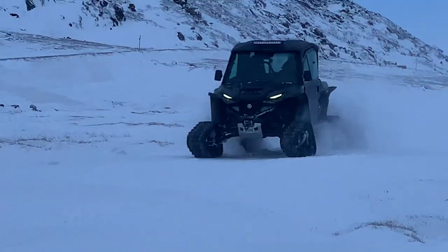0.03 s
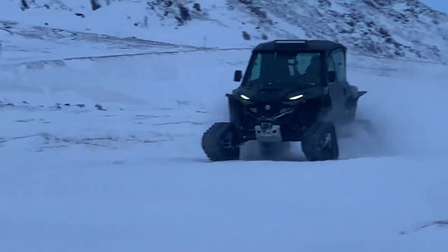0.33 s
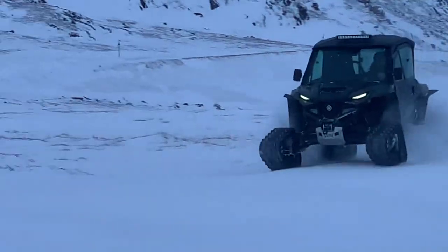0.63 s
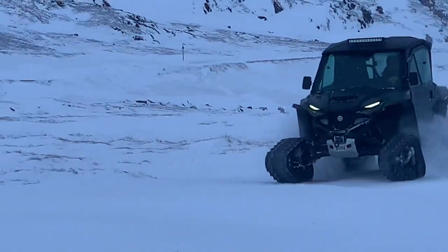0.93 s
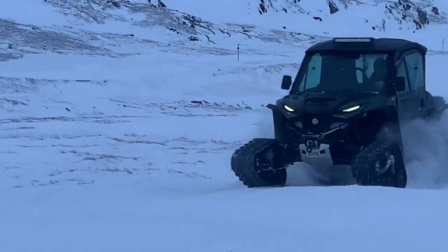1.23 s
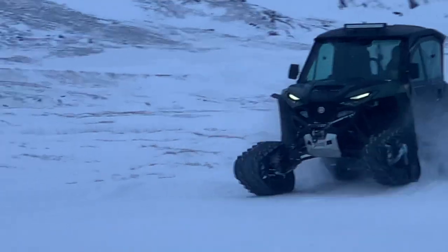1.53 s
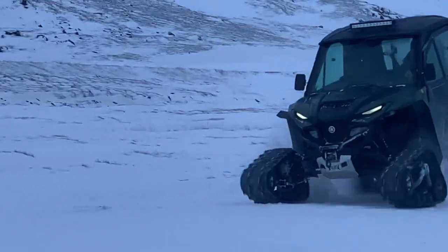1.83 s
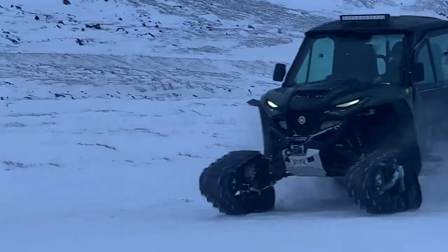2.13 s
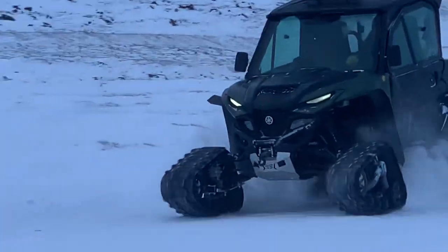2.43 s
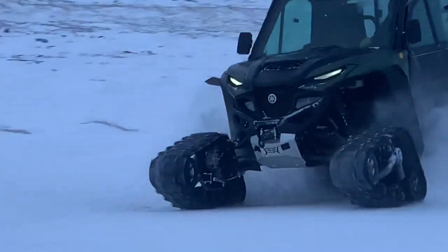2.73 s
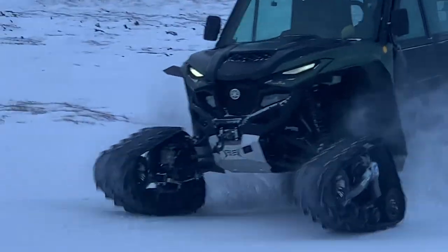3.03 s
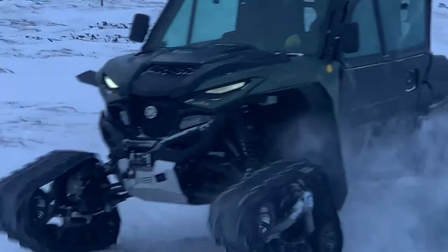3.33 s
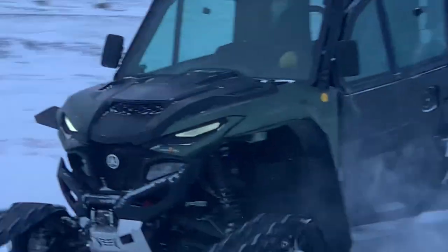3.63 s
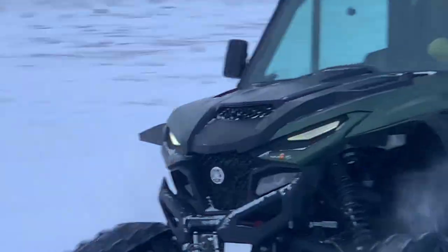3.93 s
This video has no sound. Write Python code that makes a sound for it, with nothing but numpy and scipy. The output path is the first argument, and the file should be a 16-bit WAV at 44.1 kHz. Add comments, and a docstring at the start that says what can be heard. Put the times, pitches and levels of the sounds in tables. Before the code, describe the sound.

A tracked off-road vehicle approaches across open snow, its engine droning and buzzing at nearly steady revs. The tracks patter, snow crunches and the suspension thumps lightly as it grows louder, ending close to the microphone.

```python
"""An exhaust drone is heard first, with engine buzz, clatter and the patter of track lugs: a twin-cylinder
utility vehicle on rubber tracks approaches over open snow at nearly steady revs, growing louder.
Periodic firing gives harmonics (orders) of the engine cycle rate; the lugs drum at a rate of their own.
Snow crunches and sprays in many tiny impacts, the suspension thumps over bumps, single orders whine,
and ice fizzes and ticks. Near the end the engine bay roars and the near track churns."""
import sys
import numpy as np
from scipy.fft import rfft, irfft, next_fast_len
from scipy.io import wavfile
from scipy.ndimage import map_coordinates

SR = 44100
rng = np.random.default_rng(int(sys.argv[2]) if len(sys.argv) > 2 else 0)


def bounce(signal):
    """Save signal as a 16-bit WAV file at the path given by the first command-line argument."""
    frames = np.transpose(np.atleast_2d(signal))
    limited = np.clip(frames, -1, 1)
    pcm = np.round(limited * 32767).astype(np.int16)
    wavfile.write(sys.argv[1], SR, pcm)


N = 176400

CYCLE_RATE = [(0, 58.0), (0.18, 58.2), (0.45, 56.6), (0.65, 56.2), (1, 56.8), (1.3, 57.5), (1.58, 57.9),
              (1.7, 57.1), (1.84, 55.5), (2.06, 57.5), (2.2, 56.8), (2.36, 54.7), (2.6, 57.5), (2.85, 58.0),
              (3.35, 58.1), (3.7, 57.0), (3.92, 58.0), (4, 57.9)]  # engine cycle rate: t/s, f/Hz
ODD_ORDER_LEVELS = [(0,-5.5,-9),(1.5,-2.5,-8),(2.2,-8.5,-12.5),(2.85,-6,-5.5),(3.35,-7.5,-5),(3.7,-5.5,-10.5),(4,-5.5,-7)]  # exhaust orders 1 and 3: t/s, first level/dB, third level/dB
LOW_ORDERS = [(2,-0.5),(4,-21.5),(5,-24),(6,-26.5),(7,-27.5)]  # other exhaust orders: order, level/dB
LUG_PARTIALS = [(1,-7),(1.5,-15),(2,-19.5),(3,-27)]  # track tones: multiple of the lug rate, level/dB
BUMPS = [(0.2792,-10.5,142,2.15,-23),(0.292,-19,89,5,-16),(.425,-20,130,7.3,-7.5),(0.454,-22,72,12,-35),(0.634,-15,69,12,-46),(.883,-18.5,66,15,-35),(1.7471,-8,220,1.9,-38),(1.7515,-6,112,4.5,-27),(3.435,-15.5,390,1.9,0.5),(3.4558,-5,140,2.8,-9),(3.456,-13.5,56,12,-35),(3.4565,-11.5,600,1.85,-10),(3.569,-9,280,1.9,-15),(3.594,-8.5,112,4.9,-24),(3.751,-12,245,2.4,-17)]  # suspension pulses: t/s, envelope level/dB, f/Hz, width/ms, relative rattle/dB
WHINE_SWELLS = [(5,3.9,0.19,-29),(6,3.78,.12,-31),(8,1.47,0.16,-40),(8,2.05,0.28,-39),(8,2.68,0.47,-40.5),(8,3.93,0.089,-27.5),(13,3.82,0.25,-34.5),(16,3.4,0.11,-38),(18,3.1,0.76,-42.5),(18,3.93,0.15,-37),(19,3.05,0.74,-42.5),(20,3.1,0.57,-39.5),(20,3.95,.15,-35),(21,3.32,0.25,-42.5),(22,1.75,.14,-44),(24,2.03,0.093,-39.5),(24,3.91,0.14,-30.5),(26,2.82,.55,-41.5),(26,3.95,0.074,-33),(31,3.95,0.14,-40),(32,1.27,0.33,-46.5),(32,3.58,0.1,-40.5),(41,2.03,0.11,-38),(41,2.8,0.41,-41),(42,3,0.38,-51),(43,2.68,0.37,-38),(43,3.34,0.33,-40),(44,2.75,0.16,-48),(44,3.6,0.14,-37.5),(49,3.88,0.11,-39),(58,3.7,.14,-43)]  # prominent engine orders: order, peak t/s, half-length/s, level/dB
DUST_PUFFS = [(1.64,-53),(2.21,-47)]  # puffs of ice dust: t/s, level/dB
ICE_TICKS = [(1.764,-37),(3.666,-25.5)]  # ice chip impacts: t/s, level/dB

# Envelopes: t/s, relative level/dB
EXHAUST_LEVEL = [(0,-30.5),(.22,-28),(.38,-30),(1,-27.5),(2.3,-22),(2.9,-17),(3.35,-16.5),(3.5,-16),(3.7,-14),(4,-11.5)]
CASE_LEVEL = [(0,-41.5),(.5,-40.5),(1.1,-38.5),(1.5,-35.5),(2.05,-34.5),(2.3,-35),(3.3,-30),(3.7,-30),(3.88,-26),(4,-27)]  # engine buzz and clatter
PATTER_LEVEL = [(0,-27.5),(1,-21.5),(2.2,-19),(2.45,-19.5),(2.7,-14.5),(3.3,-12.5),(4,-18)]
RUMBLE_LEVEL = [(0,-59),(.4,-38.5),(.7,-40),(1.2,-30.5),(2.3,-33),(2.8,-44),(3.3,-39),(3.5,-32),(4,-21.5)]
CRUNCH_LEVEL = [(0,-53.5),(.5,-49.5),(.68,-45.5),(.74,-44.5),(.775,-38.5),(.85,-43),(1.12,-55.5),(1.25,-49),(1.35,-40),(1.44,-42),(1.58,-48.5),(1.74,-48),(1.79,-37),(1.86,-52),(2.02,-39),(2.2,-40.5),(2.4,-42.5),(3.28,-43.5),(3.35,-36),(3.42,-39.5),(4,-42)]
SPRAY_LEVEL = [(0,-59.5),(.45,-57),(.62,-53),(1.05,-51.5),(1.2,-56.5),(1.45,-53.5),(1.75,-49.5),(2.1,-48.5),(2.55,-47),(3.45,-46.5),(3.65,-41.5),(3.85,-41.5),(4,-34.5)]

# Spectral shapes: f/Hz, relative level/dB
BUZZ_SPECTRUM = [(480,-10),(700,-3),(900,-5.5),(1150,0.5),(1280,0.5),(1400,-6),(1800,2),(2100,-12),(2420,3),(2800,-8.5),(3300,-14.5),(4500,-9)]
CLATTER_SPECTRUM = [(200,-5),(450,3.5),(900,-1),(1250,1.5),(1800,1),(2080,-4.5),(2430,2),(2800,-8),(3200,-3.5),(4500,-25.5),(7000,-28),(15000,-53)]
RUMBLE_SPECTRUM = [(20,-24),(35,-6),(50,7.5),(80,8),(130,-6.5),(190,0),(260,2.5),(350,-8),(550,-13),(900,-18),(2000,-51)]
CRUNCH_SPECTRUM = [(800,-32),(2500,1),(3700,2.5),(5000,-5),(6500,-3.5),(9000,-28.5),(15000,-33)]
SPRAY_SPECTRUM = [(2500,-18),(5000,-0.5),(6500,-9),(8000,-0.5),(9500,1),(10700,-1),(11800,-22),(13000,-10.5),(14500,-14),(15700,-24)]
RATTLE_SPECTRUM = [(100,-40),(280,8.5),(700,-3.5),(1100,-24),(3000,-62)]
DUST_SPECTRUM = [(4000,-20),(9000,-3),(12000,-8),(14000,0),(15700,-6)]
CHIP_SPECTRUM = [(3000,-23),(6500,-17),(8500,11),(11000,3),(15000,-21)]
BAY_SPECTRUM = [(200,0),(500,6),(750,12),(1400,-18),(1900,0),(2300,-2),(3200,-1),(5000,-25),(10000,-33)]
CHURN_SPECTRUM = [(60,1),(150,3.5),(240,4),(370,1.5),(480,-1.5),(720,-7.5),(1000,-10),(2500,-49)]

COHERENCE = [(45,1),(100,.997),(150,.93),(260,.8),(400,.74),(700,.6),(1300,.86),(2500,.82),(4000,.72),(5500,.8),(6800,.98),(8000,.9),(10000,.88),(11500,.99),(14000,.9)]  # likeness of left and right: f/Hz, correlation
PORT_PHASE = [(500,0),(4800,0),(5800,-1.4),(6400,-2.9),(7500,-3.4),(8500,-5.7),(9700,-6.4),(11200,-9),(12300,-9.6),(13200,-12.3),(15000,-12.8)]  # phase lead of the left microphone port: f/Hz, phase/rad
PORT_BALANCE = [(150,0),(400,1),(1300,1),(2400,2.5),(4400,-1),(8000,0)]  # left port relative to right: f/Hz, level/dB


def amp(db):
    """Amplitude ratio of a level in decibels."""
    return 10 ** (np.asarray(db) / 20)


def unit(x):
    """Normalisation to rms 1."""
    return x / np.sqrt(np.mean(x ** 2) + 1e-20)


def along(points, hz):
    """Interpolation of (f/Hz, value) points on a logarithmic frequency axis."""
    f, v = np.transpose(points)
    return np.interp(np.log(hz + 1), np.log(f + 1), v)


def curve(rows):
    """Linear interpolation of (t/s, value) points at every sample."""
    return np.interp(np.arange(N) / SR, *np.transpose(rows))


def wobble(rate):
    """Smooth random modulation: a spline through `rate` Gaussian knots a second."""
    return map_coordinates(rng.standard_normal(4096), [np.arange(N) * rate / SR], mode="mirror")


def filtered(x, response):
    """Linear filtering: the spectrum is multiplied by a complex frequency response."""
    m = next_fast_len(N + SR // 4)
    return irfft(rfft(x, m) * response(np.fft.rfftfreq(m, 1 / SR)), m)[..., :N]


def spread(pair, spectrum):
    """Partial coherence: two independent signals mix into a coloured stereo pair of rms 1."""
    def response(hz):
        angle = np.arccos(np.clip(along(COHERENCE, hz), -1, 1)) / 2
        return amp(along(spectrum, hz)) * [np.cos(angle), np.sin(angle)]
    mid, side = filtered(pair, response)
    return unit(np.array([mid + side, mid - side]))


def noise(spectrum, gate=1):
    """Source and filter: amplitude-modulated stereo noise is shaped by a spectrum."""
    return spread(gate * rng.standard_normal((2, N)), spectrum)


def grains(rate, scatter_db):
    """Shot noise: on average `rate` tiny impacts a second, rms 1."""
    hits = rng.random(N) < rate / SR
    return unit(hits * amp(scatter_db * np.minimum(rng.exponential(size=N), 4)))


def exhaust(cycle, far_waver_db, near_waver_db, rough_db, smear_rad):
    """Harmonic series of the firing pulses, dispersed by the pipe; it wavers most when far off."""
    waver_db = np.linspace(far_waver_db, near_waver_db, N)
    first_db = curve([(s, db) for s, db, _ in ODD_ORDER_LEVELS])
    third_db = curve([(s, db) for s, _, db in ODD_ORDER_LEVELS])
    drone = np.zeros(N)
    for k, db in LOW_ORDERS + [(1, first_db), (3, third_db)]:
        harmonic = np.sqrt(2) * np.cos(2 * np.pi * k * cycle - smear_rad * k * k)
        drone += amp(db + waver_db * wobble(14)) * harmonic
    return drone * amp(curve(EXHAUST_LEVEL) + rough_db * wobble(50))


def case_buzz(cycle, drift_hz, jitter_cycles):
    """Forced vibration of the case: orders 9 to 72 drift in level and phase as the vehicle moves."""
    pair, t = np.zeros((2, N)), np.arange(N) / SR
    fundamental = np.exp(2j * np.pi * (cycle + jitter_cycles * wobble(40)))
    harmonic = fundamental ** 8
    for knots in rng.standard_normal((64, 2, 2, 24)):  # order, channel, real or imaginary, knot
        harmonic = harmonic * fundamental
        for channel, (re, im) in zip(pair, knots):
            fading = np.interp(t * drift_hz, np.arange(len(re)), re + 1j * im)
            channel += (fading * harmonic).real
    return spread(pair, BUZZ_SPECTRUM)


def engine(cycle, buzz_db, near_boost_db, clatter_db, bay_db, cycle_depth_db, firing_depth_db):
    """Amplitude modulation: over the buzz, firing pulses the valve clatter and the open bay's roar."""
    pulsing = amp(cycle_depth_db * np.cos(2 * np.pi * cycle) + firing_depth_db * np.cos(4 * np.pi * cycle))
    clatter = amp(clatter_db) * noise(CLATTER_SPECTRUM, pulsing * amp(0.88 * wobble(25.3)))
    exposure = curve([(3, 0), (3.87, 1)])  # the engine bay draws level with the listener
    buzz = amp(buzz_db + near_boost_db * exposure) * case_buzz(cycle, drift_hz=3.2, jitter_cycles=0.0017)
    roar = amp(bay_db) * exposure * noise(BAY_SPECTRUM, pulsing * grains(2500, scatter_db=2.5))
    return amp(curve(CASE_LEVEL)) * (buzz + clatter) + roar


def tracks(lug_cycle, tone_db, waver_db, lumpy_db, churn_db):
    """Periodic impacts of lugs on wheels give tones over a rumble; close by, the belt slaps and churns."""
    tones = np.zeros(N)
    for k, db in LUG_PARTIALS:
        gain = amp(db + waver_db * wobble(7.6))
        tones += gain * np.cos(2 * np.pi * (k * lug_cycle + 0.08 * wobble(10)))
    lumps = amp(lumpy_db * np.tanh(wobble(45)))
    rumble = amp(curve(RUMBLE_LEVEL)) * noise(RUMBLE_SPECTRUM, lumps)
    nearness = curve([(3.32, 0), (3.58, 1)])
    churn = amp(churn_db) * nearness * noise(CHURN_SPECTRUM, grains(900, scatter_db=3))
    return amp(curve(PATTER_LEVEL) + tone_db) * tones + rumble + churn


def snow(lug_cycle, crunch_db, spray_db, lug_depth_db, clump_db):
    """Granular noise: each lug crushes a clump of crust, and powder hisses off the tracks."""
    bite = amp(lug_depth_db * np.cos(2 * np.pi * lug_cycle) + clump_db * wobble(70))
    crunch = noise(CRUNCH_SPECTRUM, bite * grains(7000, scatter_db=0))
    spray = noise(SPRAY_SPECTRUM, grains(16000, scatter_db=0.5))
    return amp(curve(CRUNCH_LEVEL) + crunch_db) * crunch + amp(curve(SPRAY_LEVEL) + spray_db) * spray


def suspension(rise_s, t60_s):
    """Impulsive excitation: a bump gives one push and rebound, and a damped rattle of the chassis."""
    push, shake = np.zeros(N), np.zeros(N)
    for s, db, hz, width_ms, rattle_db in BUMPS:
        t = np.arange(N) / SR - s
        window = np.exp(-.5 * (t * 1000 / width_ms) ** 2)
        push -= amp(db) * window * np.sin(2 * np.pi * hz * t)
        shake += amp(db + rattle_db) * np.exp(np.minimum(t / rise_s, -np.log(1000) * t / t60_s))
    return push + shake * noise(RATTLE_SPECTRUM)


def whines(cycle, whine_db, flutter_db, jitter_cycles, sway_cycles):
    """Directional radiation: single orders swell and fade as the case turns toward the listener."""
    t, pair = np.arange(N) / SR, np.zeros((2, N))
    for k, s, half_s, db in WHINE_SWELLS:
        swell = amp(db + flutter_db * wobble(21.985)) * np.exp(-((t - s) / half_s) ** 2)
        phase = k * (cycle + jitter_cycles * wobble(40)) + rng.random()  # higher orders rasp more
        sway = np.array([[1], [-1]]) * sway_cycles * wobble(3.83)  # opposite at the two ears
        pair += swell * np.cos(2 * np.pi * (phase + sway))
    return amp(whine_db) * pair


def ice(tick_s, puff_s):
    """Noise transients: fine dust fizzes in short puffs, and chips of ice tick against the bodywork."""
    t = np.arange(N) / SR
    ticks = sum(amp(db) * np.exp(-abs(t - s) / tick_s) for s, db in ICE_TICKS)
    puffs = sum(amp(db) * np.exp(-((t - s) / puff_s) ** 2) for s, db in DUST_PUFFS)
    return ticks * noise(CHIP_SPECTRUM) + puffs * noise(DUST_SPECTRUM)


def scene():
    """Superposition of the sources; engine and lug phases, in cycles, are integrals of separate rates."""
    cycle = np.cumsum(curve(CYCLE_RATE)) / SR
    lug_hz = 127.17 * (1 + 0.0083 * wobble(3))
    lug_cycle = np.cumsum(lug_hz) / SR
    drone = exhaust(cycle, far_waver_db=2.5, near_waver_db=1.06, rough_db=1.68, smear_rad=0.556)
    return (amp(-0.5) * drone
            + engine(cycle, buzz_db=-4.0, near_boost_db=2.5, clatter_db=-0.1, bay_db=-29.5,
                     cycle_depth_db=-0.2, firing_depth_db=-1.7)
            + tracks(lug_cycle, tone_db=0.04, waver_db=1.5, lumpy_db=9.5, churn_db=-21.5)
            + snow(lug_cycle, crunch_db=2.0, spray_db=3, lug_depth_db=2.5, clump_db=2.0)
            + suspension(rise_s=0.0011, t60_s=0.056)
            + whines(cycle, whine_db=1.0, flutter_db=3.0, jitter_cycles=0.0029, sway_cycles=0.015)
            + ice(tick_s=0.0018, puff_s=.045))


def record(dry, ceiling=.92, top_hz=15700):
    """Phase and level differences between two microphone ports, then soft saturation and a band limit."""
    half = np.array([[.5], [-.5]])
    def port_response(hz):
        return np.exp(1j * half * along(PORT_PHASE, hz)) * amp(half * along(PORT_BALANCE, hz))
    ports = filtered(dry, port_response)
    rounded = ports / (1 + abs(ports / ceiling) ** 10) ** (1 / 10)
    return filtered(rounded, lambda hz: hz < top_hz)


dry = scene()
out = record(dry)
bounce(out)
```